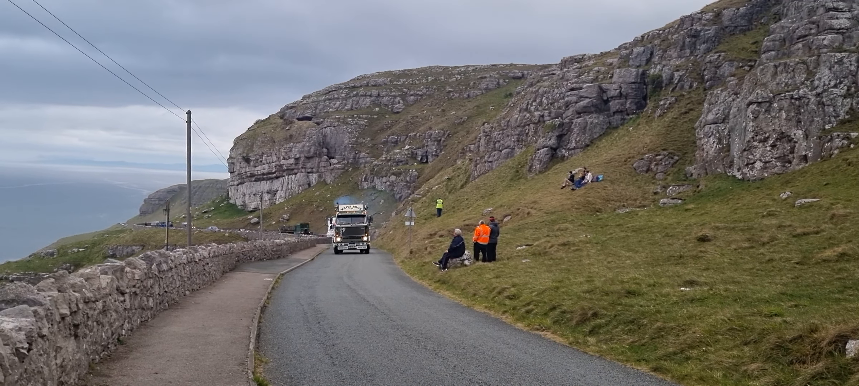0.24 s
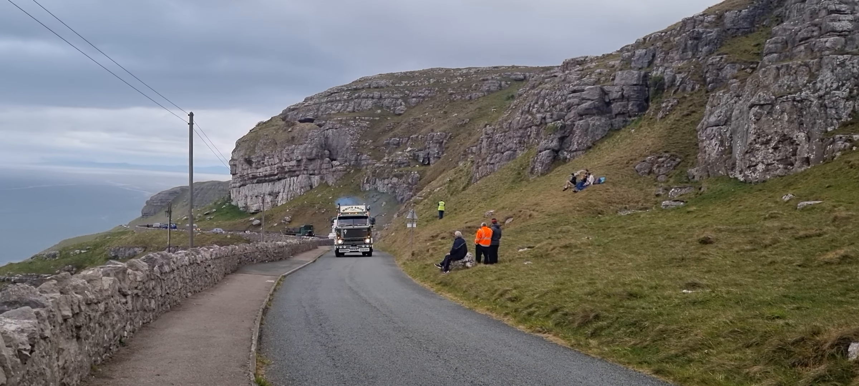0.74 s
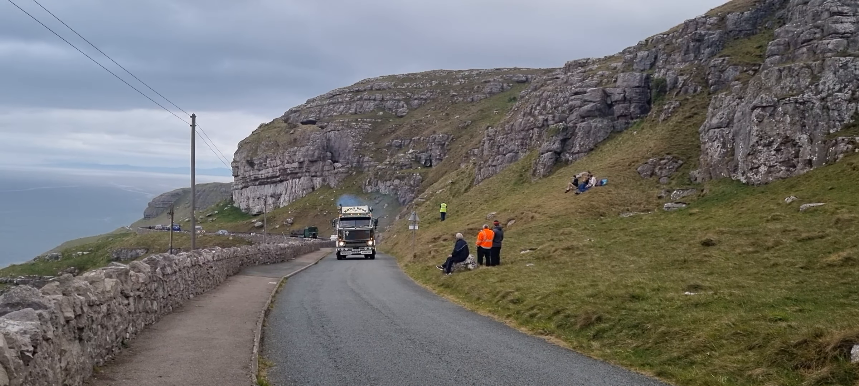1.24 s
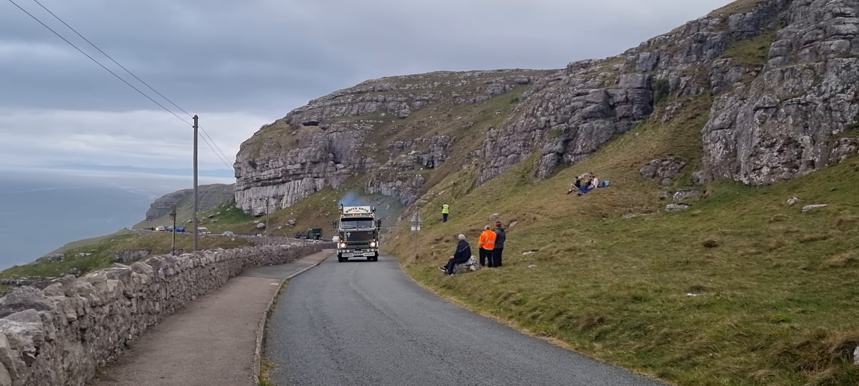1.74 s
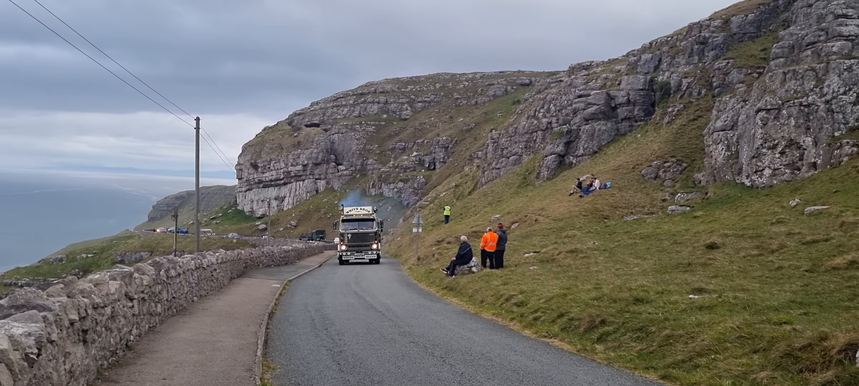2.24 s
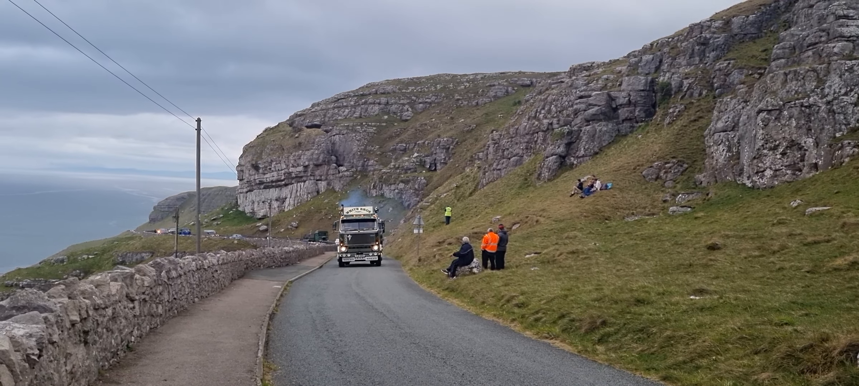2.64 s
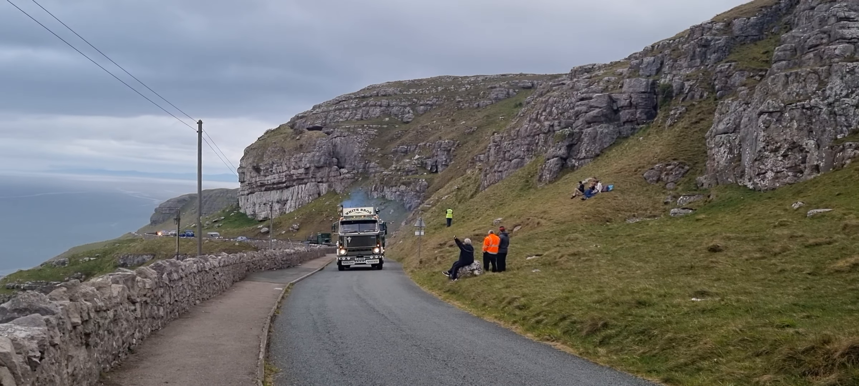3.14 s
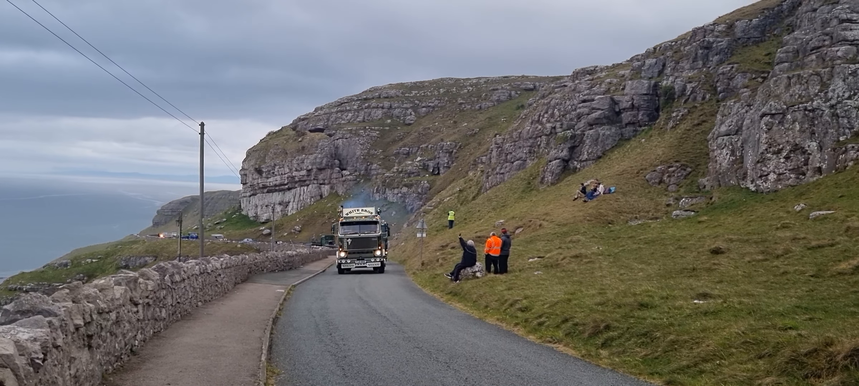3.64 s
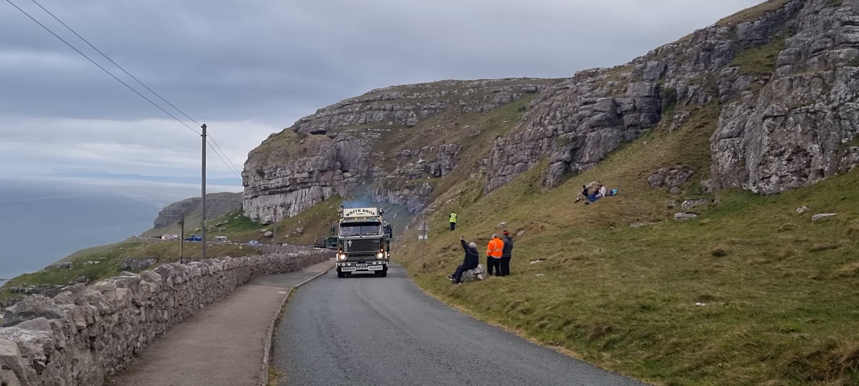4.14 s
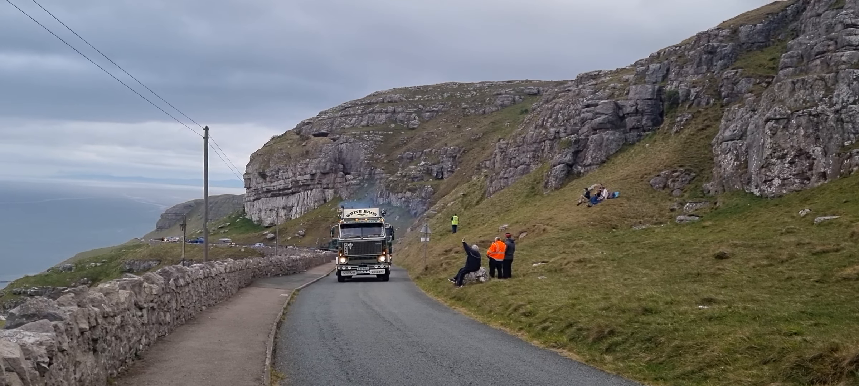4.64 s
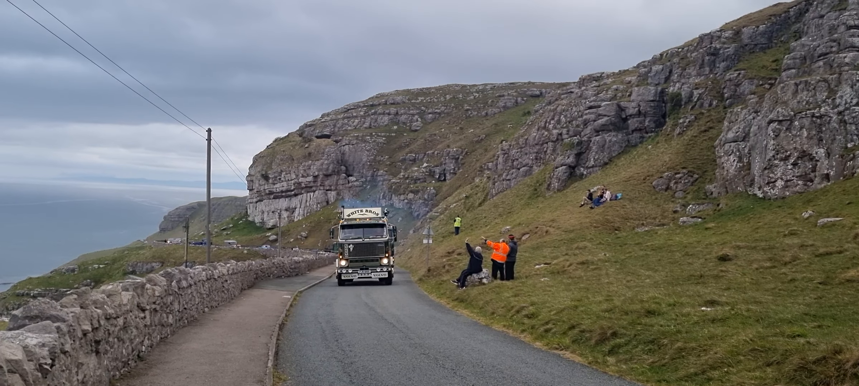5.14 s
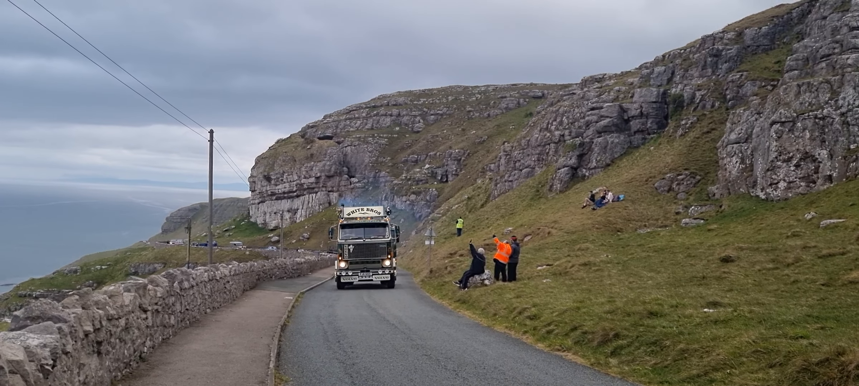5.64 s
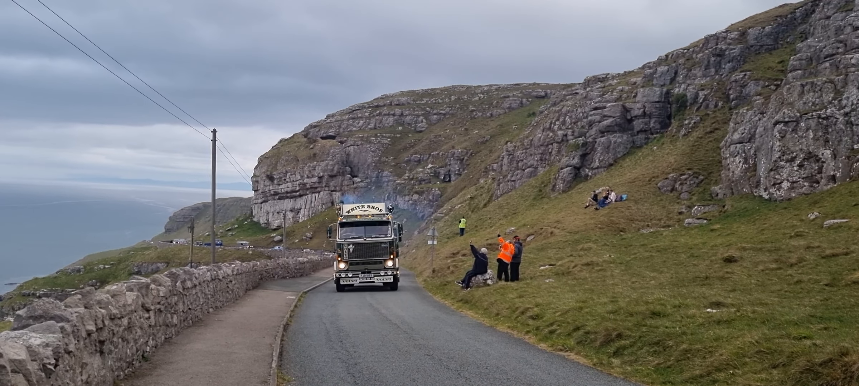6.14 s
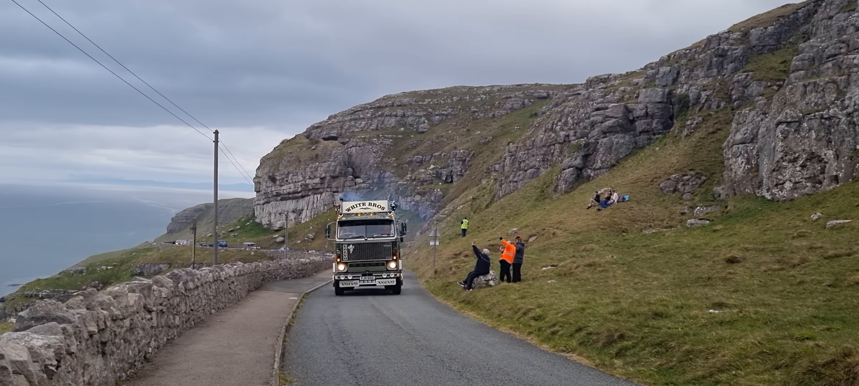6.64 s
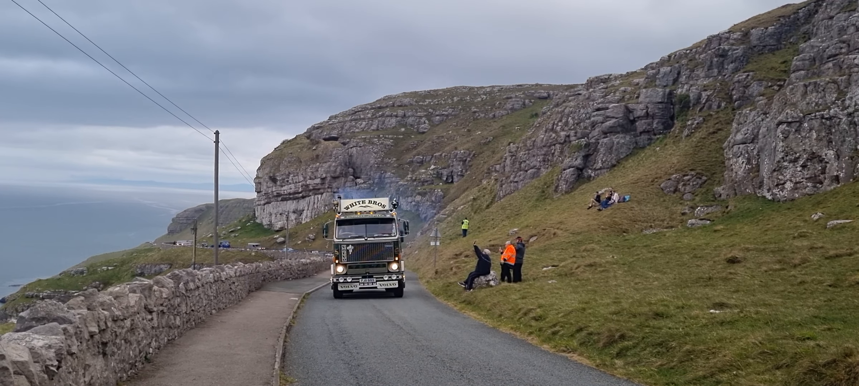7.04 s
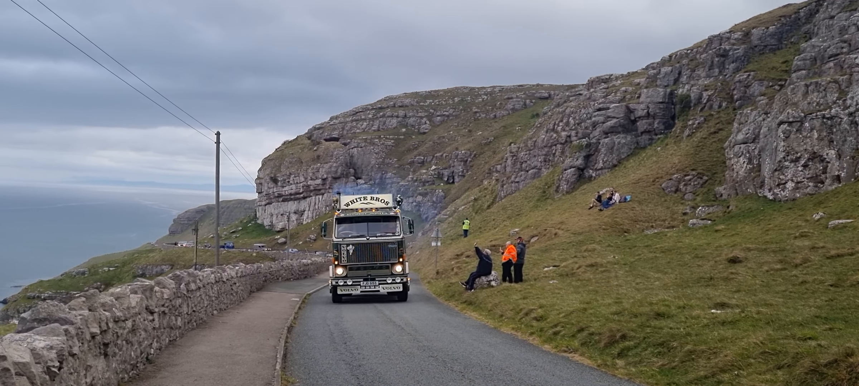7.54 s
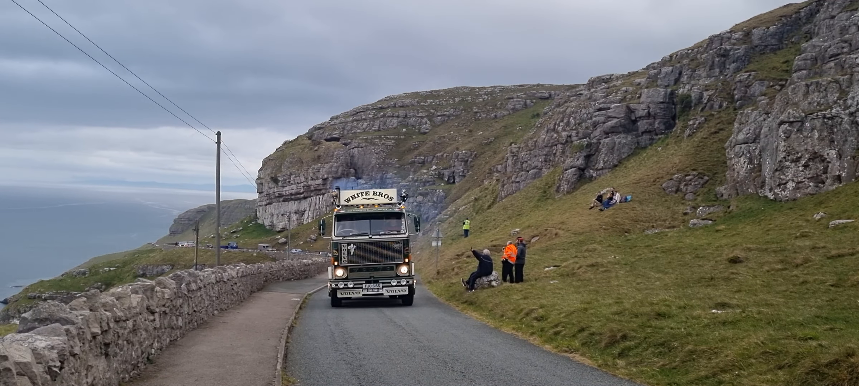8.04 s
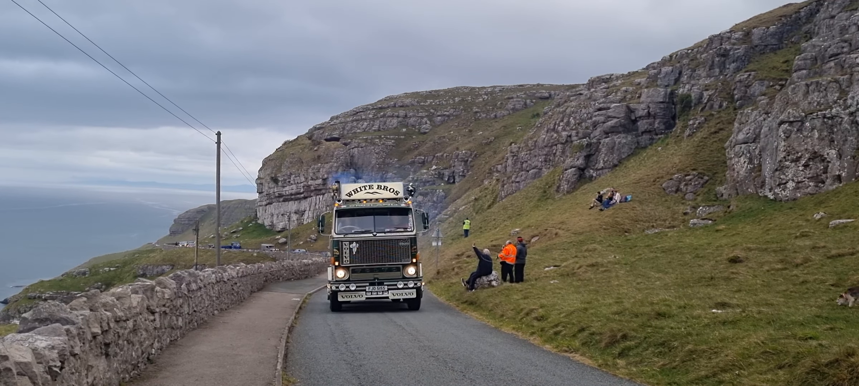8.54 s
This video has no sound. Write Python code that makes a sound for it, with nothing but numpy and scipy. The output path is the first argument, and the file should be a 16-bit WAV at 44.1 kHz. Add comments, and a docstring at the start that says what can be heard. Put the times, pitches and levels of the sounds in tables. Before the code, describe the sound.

Heard from the roadside, one vehicle draws away with fading tyre noise and a low drone as an old diesel lorry slowly comes closer. A loud, brassy air horn blares for about a second, far above the engines, leaving a short echo from the rocky slope. The engine noise drops briefly and builds again, then two quick, deeper toots sound while the lorry keeps clattering nearer.

```python
"""Lorry horns on a coast road

An old diesel lorry climbs towards you under a limestone cliff, louder and brighter as it nears.
It gives one long blast on a pair of air horns, then two toots on a lower pair. Each pair is slightly
out of tune, so it wavers. A second vehicle draws away, droning harder whenever it speeds up.
The blast pushes down an automatic volume control, which creeps back afterwards."""
import sys
import numpy as np
from scipy import signal
from scipy.fft import rfft, irfft, next_fast_len
from scipy.io import wavfile
from scipy.ndimage import uniform_filter1d

SR = 44100
rng = np.random.default_rng(int(sys.argv[2]) if len(sys.argv) > 2 else 0)


def dump_mix(stems):
    """Bounce the given channels to the path in sys.argv[1] as a 16-bit WAV at rate SR."""
    frames = np.atleast_2d(stems).T  # one column per channel
    limited = np.clip(frames, -1, 1)  # hard clip at full scale
    pcm = np.round(limited * 32767).astype(np.int16)
    wavfile.write(sys.argv[1], SR, pcm)


N = 387638
T = np.arange(N) / SR
FFT_SIZE = next_fast_len(N, True)
HZ = np.maximum(np.arange(FFT_SIZE // 2 + 1) * SR / FFT_SIZE, 1)
CUTOFF_HZ = 15800
OPPOSED = np.array([[1], [-1]])  # plus on the left, minus on the right


def from_db(db):
    """Turn decibels into a number to multiply by."""
    return 10 ** (np.asarray(db) / 20)


def unit_power(x):
    """Scale a signal to an average power of 1."""
    return x / np.sqrt(np.mean(x ** 2) + 1e-20)


def at_hz(rows, hz):
    """Read each column of a frequency table at the given frequencies."""
    points, *columns = np.transpose(rows)
    return [np.interp(np.log(hz), np.log(points), c) for c in columns]


def filtered(x, gain):
    """Turn each frequency up or down by its own gain."""
    return irfft(rfft(x, FFT_SIZE) * gain, FFT_SIZE)[..., :N]


def drift(rate_hz):
    """A random wobble, about 1 in size."""
    return unit_power(filtered(rng.standard_normal(N), 1 / (1 + (HZ / rate_hz) ** 2)))


def noise(colour, spread):
    """Shaped stereo noise; spread makes left and right differ, least in the bass."""
    mid, side = rfft(rng.standard_normal((2, FFT_SIZE)))
    stereo = mid + spread * HZ / (HZ + 100) * side * OPPOSED
    return unit_power(irfft(stereo * from_db(at_hz(colour, HZ)[0]), FFT_SIZE)[:, :N])


def turns(rate_hz, zero_at_s):
    """Count cycles from a given moment."""
    count = np.cumsum(rate_hz) / SR
    return count - np.interp(zero_at_s, T, count)


# How fast the second vehicle's engine fires: time_s, firing_hz
FAR_ENGINE_SPEED = [(0, 51.5), (2.85, 50.5), (3.9, 57), (5.1, 50.5), (5.9, 61.6), (6.5, 62.5), (8, 57),
                    (8.79, 54)]
# The tone of its low rumble: frequency_hz, level_db
RUMBLE_COLOUR = [(15, -35.5), (30, -2.5), (45, 0), (80, 11.5), (110, 3), (170, -15), (300, -10.5),
                 (900, -69)]
# The tone of its tyres on the road: frequency_hz, level_db
TYRE_COLOUR = [(100, -10), (300, 0), (750, -2.5), (1500, -18), (3500, -17.5), (5000, -33.5), (7700, -38),
               (9200, -58), (12000, -44.5), (15500, -49.5)]
def far_vehicle():
    """A vehicle draws away: tyres fade first, then rumble; the drone lasts and swells as it speeds up."""
    firing_hz = np.interp(T, *np.transpose(FAR_ENGINE_SPEED))
    nearest_s, passing_s = 0.14, 0.79
    doublings = np.log2(np.hypot(1, (T - nearest_s) / passing_s))  # of its distance
    effort_db = 0.66 * uniform_filter1d(np.gradient(firing_hz, T), size=SR // 3)
    drone_db = -30.5 - 1.68 * doublings + effort_db + 3.4 * drift(9.3)
    drone = np.sqrt(2) * np.sin(2 * np.pi * turns(firing_hz, 0)) * from_db(drone_db)
    rumble = noise(RUMBLE_COLOUR, spread=0.79) * from_db(-29.5 - 3 * doublings + 0.5 * drift(5.0))
    tyres = noise(TYRE_COLOUR, spread=0.89) * from_db(-41 - 15 * doublings)
    return drone + rumble + tyres


# The tones in the lorry's exhaust note: waves_per_engine_cycle, level_db
EXHAUST_TONES = [(4, -11.5), (6, -29.5), (9, -18.5), (12, -2.5), (18, -6.5), (20, -8), (26, -23.5),
                 (32, -20), (42, -16), (44, -25.5), (66, -13), (88, -16.5)]
# The tone of the diesel clatter: frequency_hz, level_db
CLATTER_COLOUR = [(60, -2.5), (160, 9.5), (280, -1.5), (440, 4), (620, -2), (830, 0.5), (960, -0.5),
                  (1170, -0.5), (1500, -4), (2200, -9), (3200, -8), (4400, -22.5), (6200, -41), (7700, -42),
                  (9200, -62.5)]
# The engine block ringing under one loud cylinder: frequency_hz, level_db
BLOCK_COLOUR = [(600, -48.5), (1050, 2), (1170, 9.5), (1320, -24.5), (2900, -28.5), (3250, -15.5),
                (3600, -49.5), (6000, -85)]
# The tone of the engine's hiss and tick: frequency_hz, level_db
HISS_COLOUR = [(3000, -22.5), (5000, 7), (6400, -24), (7800, -13.5), (9200, -17.5), (10500, -8.5),
               (12200, -2.5), (15500, -8.5)]
def lorry_engine():
    """Six cylinders hum, clatter and hiss, with one tick per cycle; all grow as the lorry nears."""
    start_hz, cruise_hz, settle_s = 56.2, 58.73, 1.6
    sag_hz = 2.2 * np.maximum(T - 7.75, 0)  # the driver eases off
    firing_hz = cruise_hz + (start_hz - cruise_hz) * np.exp(-T / settle_s) - sag_hz
    cycle = turns(firing_hz / 6 * (1 + .003 * drift(4)), zero_at_s=6.209)
    knock = np.cos(2 * np.pi * 6 * cycle)  # peaks at every firing
    loud_cylinder = np.cos(2 * np.pi * cycle)

    start_m, speed_m_per_s, full_treble_m = 78.5, 5.4, 39.7
    distance_m = np.maximum(start_m - speed_m_per_s * T, 1)
    halvings = np.log2(start_m / distance_m)
    near_db = 4 * halvings
    # Air takes most from the treble, so the treble grows fastest.
    treble_db = 24.5 * np.log2(start_m / np.maximum(distance_m, full_treble_m))

    note = sum(from_db(db + 2.2 * drift(8.1)) * np.sin(2 * np.pi * (round(waves) * cycle + rng.random()))
               for waves, db in EXHAUST_TONES)
    exhaust = np.sqrt(2) * from_db(-39 + 5 * halvings) * note
    clatter = noise(CLATTER_COLOUR, spread=0.51)
    clatter *= from_db(-39.5 + near_db + 0.92 * knock + 0.52 * drift(23))
    block = noise(BLOCK_COLOUR, spread=0.33)
    block *= from_db(-49 + near_db + 2.2 * loud_cylinder + 3.2 * drift(6.5))
    hiss = noise(HISS_COLOUR, spread=1.0) * from_db(-86 + treble_db + 1.6 * knock + 1.4 * drift(15))
    tick = noise(HISS_COLOUR, spread=.5) * from_db(-78.5 + treble_db + 3 * drift(5.4))
    tick *= np.exp(-(cycle % 1) / 0.084)
    return exhaust + clatter + block + hiss + tick


# What the hillside throws back: frequency_hz, gain_db
ECHO_COLOUR = [(100, -9), (340, 15), (520, 6.5), (1000, 3.5), (1700, -8), (4000, -8), (9000, -15.5),
               (15000, -30.5)]
def hillside(x):
    """A short echo from the wall and slope close by, and a faint long one from the cliff."""
    t = T[:2 * SR]
    echo = 0
    for level_db, fade_s in ((-11, 0.38), (-23, 1.4)):
        tail = rng.standard_normal((2, len(t))) * from_db(-60 * t / fade_s) * (t > .012)
        echo = echo + from_db(level_db) * tail / np.sqrt(np.sum(tail ** 2) / 2)
    return signal.fftconvolve(filtered(x, from_db(at_hz(ECHO_COLOUR, HZ)[0])), echo, axes=1)[:, :N]


def gusts(t, rate_hz):
    """Moving air sways a wave's level and timing at random, differently on each side."""
    knots = np.arange(0, T[-1], 1 / rate_hz)
    return np.array([np.interp(t, knots, a + 1j * b) for a, b in rng.standard_normal((2, 2, len(knots)))])


def pulse_shape(tone, hz, bounce):
    """Gain and phase of each harmonic: a sharp, ringing pulse, bouncing between horn mouth and cab."""
    gain = from_db(at_hz(tone, hz)[0])
    log_gain = np.log(np.r_[gain[0] / 2, gain, gain[-2::-1]])
    phase = -signal.hilbert(log_gain).imag[1:len(hz) + 1]  # packs the energy at the pulse's front
    for delay_s in (.00028, .00085):
        delayed = np.exp(-2j * np.pi * hz * delay_s)
        phase = phase + np.angle((delayed - bounce) / (1 - bounce * delayed))
    return gain, phase


def horn(tone, start_s, stop_s, pitch_hz, in_step_s,
         sharp_hz, rise_s, fall_s, bounce, end_bend_hz, squawk_db, scatter):
    """Air shakes a thin metal disc; low harmonics start first and end last, high ones need pressure."""
    live = (T > start_s - .04) & (T < stop_s + .18)
    t = T[live]
    pressure = np.exp(-np.maximum(t - stop_s, 0) / fall_s) / (1 + np.exp((start_s - t) / rise_s))
    # At half pressure the disc chatters, on opening and again on closing.
    opening = np.exp(-((T - start_s + 0.0028) / 0.026) ** 2)
    closing = np.exp(-((T - stop_s) / 0.028) ** 2)
    chatter_hz = 2.0 * (opening + closing) * drift(110)
    onset_hz = sharp_hz * np.exp(-np.maximum(T - start_s, 0) / 0.082)
    release_hz = end_bend_hz * (1 - np.exp(-np.maximum(T - stop_s + 0.025, 0) / fall_s))
    cycles = turns(pitch_hz + onset_hz + release_hz + chatter_hz, in_step_s)
    lowest_wave = np.exp(2j * np.pi * cycles[live])
    harmonics_hz = pitch_hz * np.arange(1, int(CUTOFF_HZ / pitch_hz) + 1)
    gains, phases = pulse_shape(tone, harmonics_hz, bounce)
    out, wave = np.zeros((2, N)), 1
    for hz, gain, phase in zip(harmonics_hz, gains, phases):
        wave = wave * lowest_wave  # step up to the next harmonic
        swell = pressure ** (0.38 + np.sqrt(hz / 1300))
        squawk = 1 + (from_db(squawk_db) - 1) * np.exp(-np.log2(hz / 1700) ** 2 / 0.03) * closing[live]
        air = 1 + scatter * hz / (hz + 5000) * gusts(t, rate_hz=14)  # ruffles short waves most
        out[:, live] += gain * swell * squawk * (air * wave * np.exp(1j * phase)).real
    return np.sqrt(2) * out


def horn_pair(tones, openings, rasp_db, **voice):
    """Two horns on one valve: their pulses slide past each other, so each harmonic wavers in level."""
    first_tone, twin_tone = np.array(tones)[:, :2], np.array(tones)[:, ::2]
    out = np.zeros((2, N))
    for start_s, stop_s, pitch_hz, offset_hz, in_step_s, late_s, level_db in openings:
        first = horn(first_tone, start_s, stop_s, pitch_hz, in_step_s, **voice)
        twin = horn(twin_tone, start_s + late_s, stop_s, pitch_hz + offset_hz, in_step_s, **voice)
        out += from_db(level_db) * (first + twin)
    # Swirls in the air jet roughen the upper harmonics.
    return out + from_db(rasp_db) * filtered(out, HZ / (HZ + 5000)) * drift(370)


# The tone of the low horns: frequency_hz, first_horn_db, twin_horn_db
LOW_HORN_TONES = [(122, -26.5, -37.5), (250, -38.5, -48), (359, -27.5, -31.5), (561, -37.5, -38.5),
                  (825, -36.5, -33.5), (1192, -22, -28.5), (1696, -40, -37), (2910, -43.5, -46.5),
                  (3280, -35.5, -47.5), (3930, -52.5, -55), (5300, -64, -51.5), (6260, -70.5, -68),
                  (9400, -75, -72), (12660, -60, -74), (15500, -74, -80)]
# When their air valve opens; at in_step_s the two horns pulse together:
# start_s, stop_s, pitch_hz, twin_offset_hz, in_step_s, twin_late_s, level_db
TOOT_OPENINGS = [(7.461, 7.578, 121.9, -0.29, 7.335, 0.0036, 1.3),
                 (7.706, 7.875, 122.5, -0.493, 7.35, 0.0033, 0.64)]
def short_toots():
    """Two quick puffs of air sound the low horns, which squawk as the valve shuts."""
    return horn_pair(LOW_HORN_TONES, TOOT_OPENINGS, rasp_db=-7.5, sharp_hz=0.33, rise_s=0.0084,
                     fall_s=0.035, bounce=0.3, end_bend_hz=-1.94, squawk_db=6.0, scatter=1.0)


def blurt(openings):
    """Just before the disc slaps its seat it swings freely, a little sharp, on two low harmonics."""
    lead_s, length_s, sharp_hz = 0.0016, 0.01, 6.3
    out = np.zeros(N)
    for start_s, _, pitch_hz, *_ in openings:
        age_s = T - start_s + lead_s
        swing = 2 * np.pi * (pitch_hz + sharp_hz) * age_s
        out += from_db(-16) * np.exp(-(age_s / length_s) ** 2) * (np.sin(swing) + np.sin(2 * swing))
    return out


# The tone of the high horns: frequency_hz, first_horn_db, twin_horn_db
HIGH_HORN_TONES = [(168, -23.3, -23.7), (336, -25, -31.5), (504, -38.5, -43), (672, -42, -44),
                   (1050, -24, -28), (1850, -23, -27), (2050, -35, -40), (3150, -29, -35.5),
                   (3600, -37, -41), (4250, -35.5, -40.5), (6300, -48, -53), (9300, -52, -56),
                   (11200, -45, -49), (12100, -37, -41), (15500, -48, -53)]
# When their air valve opens: start_s, stop_s, pitch_hz, twin_offset_hz, in_step_s, twin_late_s, level_db
BLAST_OPENINGS = [(4.054, 4.985, 167.75, 1.0, 4.635, .035, 6)]
def long_blast():
    """The valve is held open: the high horns start with a blurt, then blare."""
    blare = horn_pair(HIGH_HORN_TONES, BLAST_OPENINGS, rasp_db=-10.5, sharp_hz=0.54, rise_s=0.005,
                      fall_s=0.014, bounce=0.35, end_bend_hz=2.9, squawk_db=-4.0, scatter=0.84)
    return blurt(BLAST_OPENINGS) + blare


def scene():
    """Horns and their echoes, over the two vehicles."""
    horns = long_blast() + short_toots()
    return horns + hillside(horns) + lorry_engine() + far_vehicle()


# How the two microphones differ: frequency_hz, left_minus_right_db, right_lag_radians
MICROPHONE_PAIR = [(100, 0, .2), (280, 0, 0.13), (549, -5, 0.77), (677.6, 0.5, 3.6), (798, 5.5, 1.9),
                   (1060, -3.5, 1.83), (1250, 4, 1.81), (2350, -10.5, 2.02), (2640, -2.5, 4.4),
                   (2900, -3.5, 3.87), (3515, -31, 5.6), (3590, -2, 8.2), (4470, -0.5, 9.28),
                   (6450, 14.5, 11.1), (8700, 10, 16), (13230, -3, 23.1), (15500, 24.5, 68)]
def microphones(x):
    """Left and right each colour the sound in their own way, and the right lags behind."""
    balance_db, lag = at_hz(MICROPHONE_PAIR, HZ)
    gains = from_db(balance_db * OPPOSED / 2)
    gains = gains / np.sqrt(np.mean(gains ** 2, axis=0))
    return filtered(x, gains * np.exp(-1j * lag * np.arange(2)[:, None]))


def volume_control(x, limit_db, recover_db_per_s):
    """Loud sound pulls the volume down at once; it returns slowly."""
    power = uniform_filter1d(np.mean(x ** 2, axis=0), size=530)
    excess_db = np.maximum(10 * np.log10(np.maximum(power, 1e-12)) - limit_db, 0)
    recovery_db = recover_db_per_s * T
    cut_db = np.maximum.accumulate(excess_db + recovery_db) - recovery_db
    return x * from_db(-uniform_filter1d(cut_db, size=200))


def record(dry):
    """Pick up the sound, control its volume, clip the peaks and cut the highest treble."""
    held = volume_control(microphones(dry), limit_db=-9.5, recover_db_per_s=2.5)
    clipped = np.clip(held, -.95, .95)
    return filtered(clipped, 1 / np.sqrt(1 + (HZ / CUTOFF_HZ) ** 300))


dry = scene()
out = record(dry)
dump_mix(out)
```